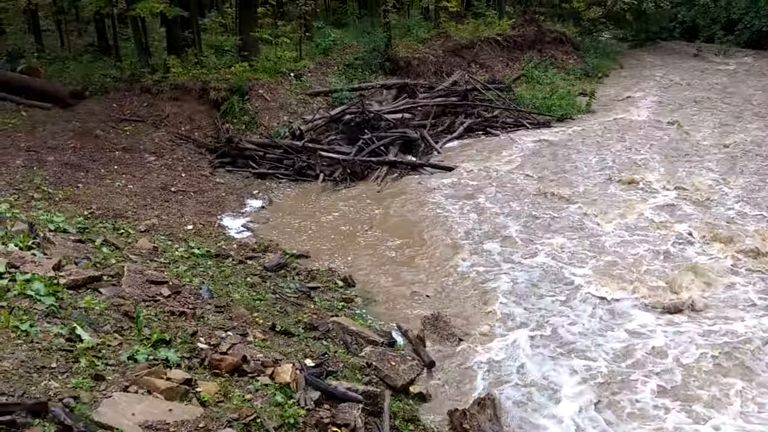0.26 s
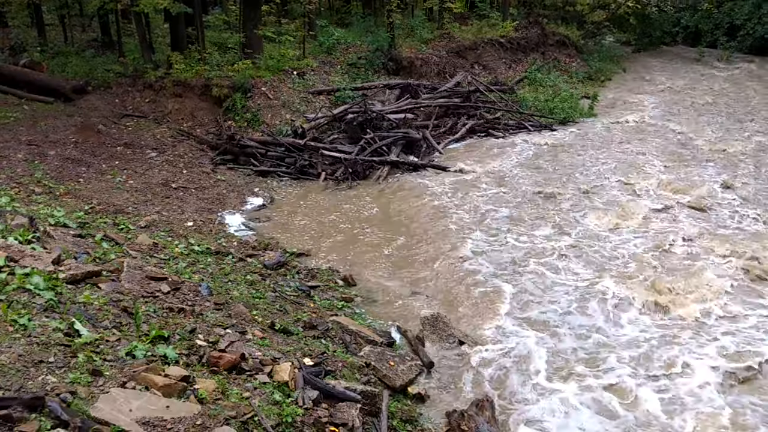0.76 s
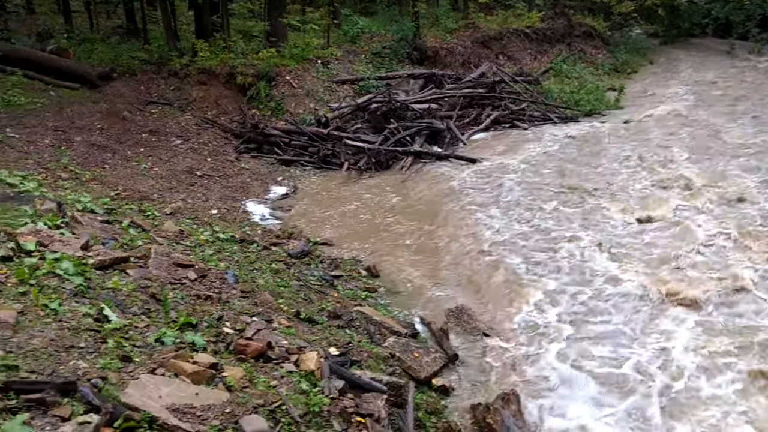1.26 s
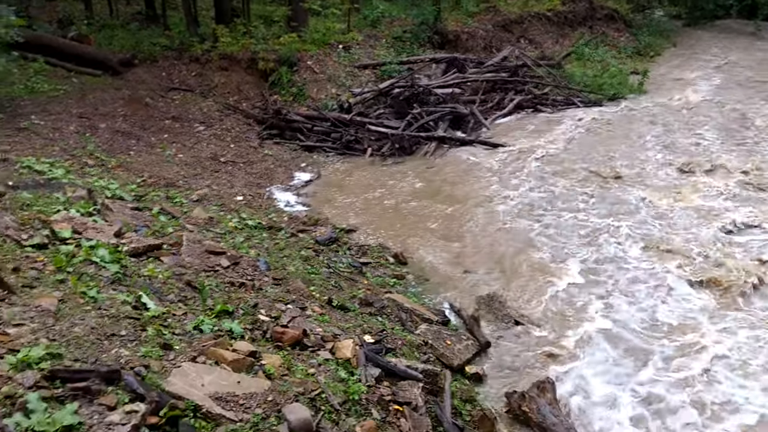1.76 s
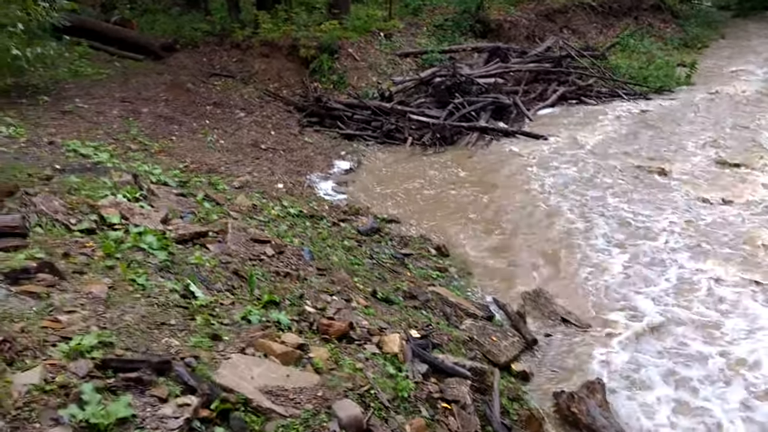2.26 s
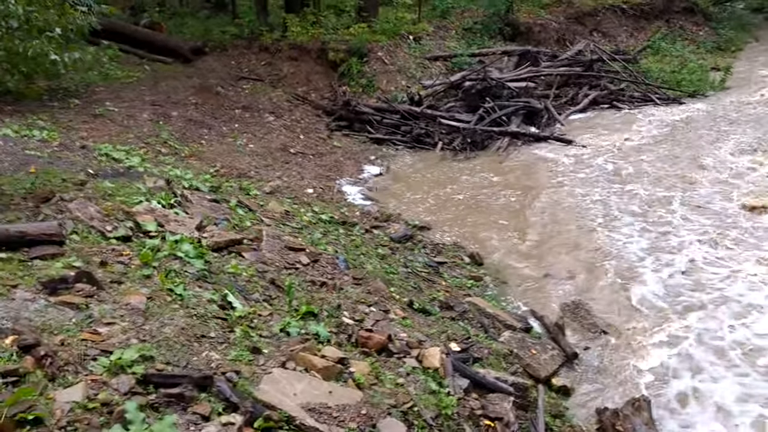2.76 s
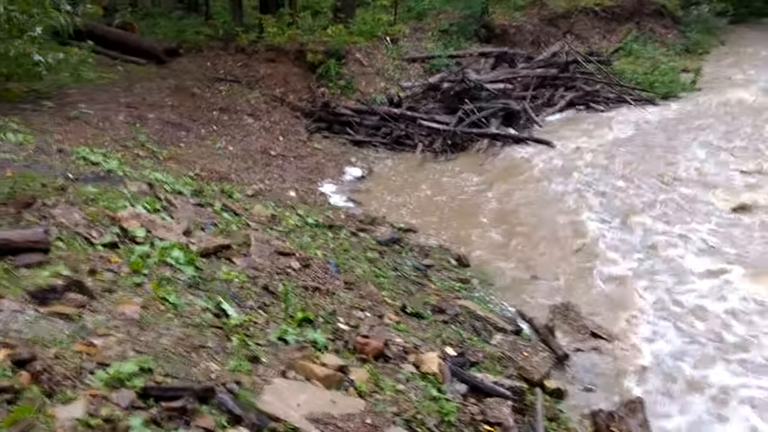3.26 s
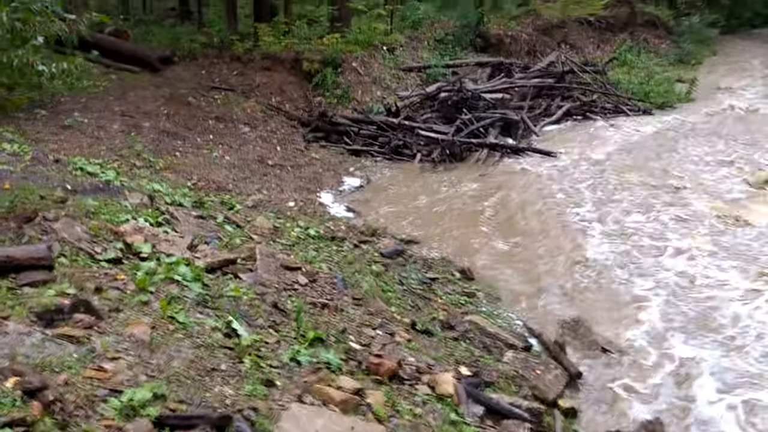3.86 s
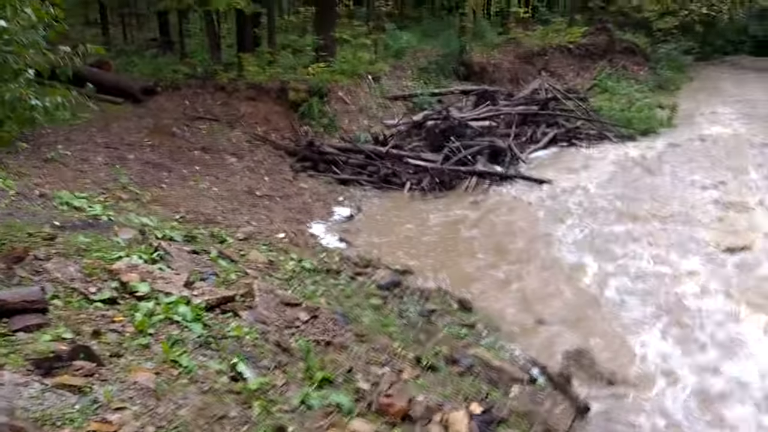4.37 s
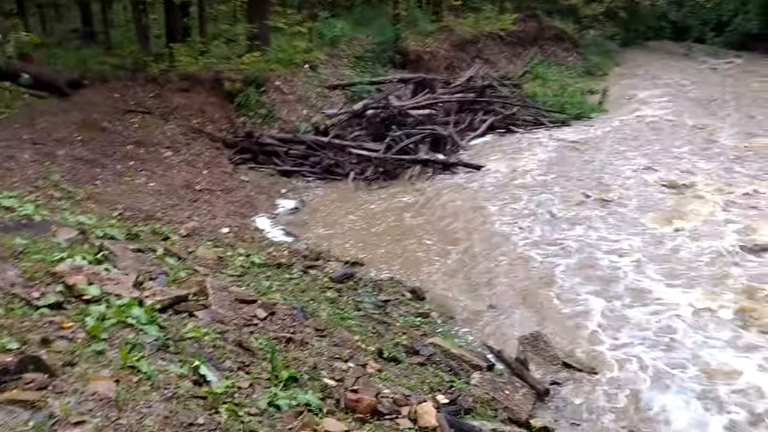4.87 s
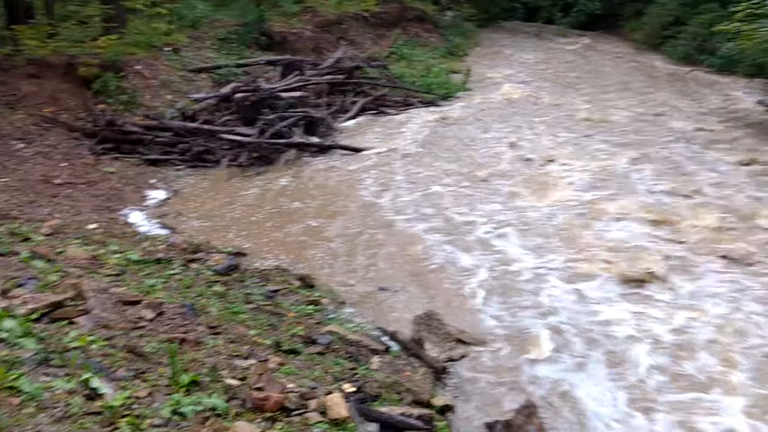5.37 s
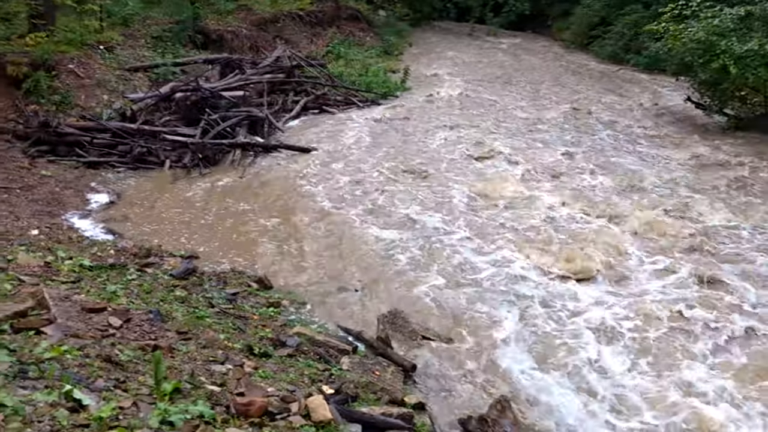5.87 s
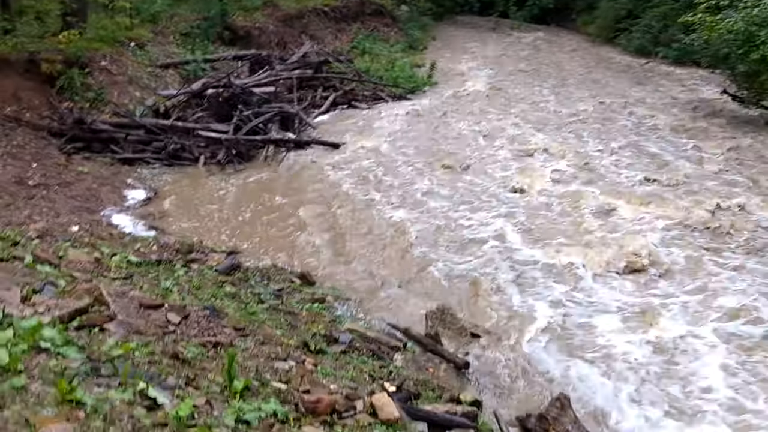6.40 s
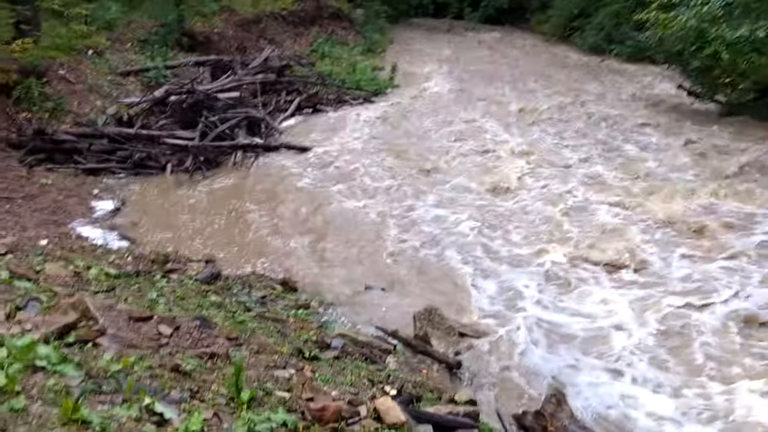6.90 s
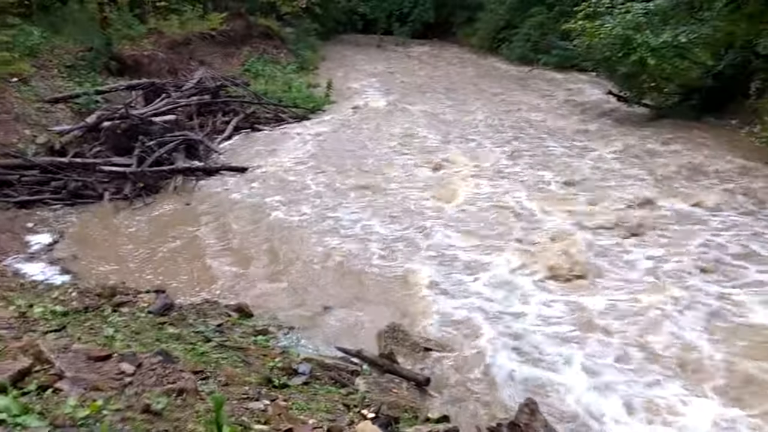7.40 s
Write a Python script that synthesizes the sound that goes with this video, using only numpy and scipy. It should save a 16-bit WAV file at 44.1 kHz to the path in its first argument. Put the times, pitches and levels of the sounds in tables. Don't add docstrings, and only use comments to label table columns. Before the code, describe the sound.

Outdoors beside a flooded creek, fast water roars steadily over rocks, mostly on the right of a handheld stereo microphone. A burst of spray splashes near the left at the start and quickly dies to drips. Small irregular surges then lift the low rumble, midrange churn, gurgling bubbles and hissing spray together. The sound grows slightly softer as the camera turns upstream.

```python
import sys
import numpy as np
from scipy import signal
from scipy.fft import rfft, irfft, next_fast_len
from scipy.io import wavfile
from scipy.ndimage import uniform_filter1d, map_coordinates

SR = 44100
rng = np.random.default_rng(int(sys.argv[2]) if len(sys.argv) > 2 else 0)


def int16_out(signal):
    q = np.round(np.clip(np.atleast_2d(signal).T, -1, 1) * 32767)
    wavfile.write(sys.argv[1], SR, q.astype(np.int16))


def makeup_ratio(level_db):
    decades = np.asarray(level_db, float) / 20
    return 10 ** decades


N = 336924
TIME_S = np.arange(N) / SR

# pitch_hz [Hz], level_db [dB per Hz]
MIST_COLOR = [(6000, -25), (8200, -8), (9600, -2), (10800, -1.5), (12300, 2.5), (13400, 0), (14500, 2.5),
              (15200, 5.5), (16500, -1.5)]
# pitch_hz [Hz], level_db [dB per Hz]
ROAR_COLOR = [(25, -41), (45, -19.5), (70, -9), (100, 0), (150, -2), (250, -3.5), (400, -8.5), (700, -26),
              (1200, -37)]
# pitch_hz [Hz], level_db [dB per Hz]
SPLASH_COLOR = [(800, -30), (2000, 2), (3000, 2), (4500, 0), (7000, -10), (12000, -30)]
# pitch_hz [Hz], level_db [dB per Hz]
SPRAY_COLOR = [(1200, -64), (2200, 3.5), (2800, 2.5), (3800, -3.5), (5200, -2.5), (6500, -5.5),
               (8000, -6.5), (9500, -10.5), (12000, -38)]
# pitch_hz [Hz], level_db [dB per Hz]
CHURN_COLOR = [(120, -34), (250, -5.5), (450, 1), (800, -1), (1300, -1), (1800, -1), (2300, -6.5),
               (3000, -18), (4500, -23.5)]
# crest_s [s], swell_db [dB], half_length_s [s]
BREAKING_WAVES = [(0.03, 2, 0.32), (0.4, 2, 0.17), (0.64, 2.5, 0.1), (0.92, 2.0, 0.16), (1.088, 3, 0.063),
                  (1.418, 1.7, 0.32), (1.694, 2.5, 0.075), (1.86, 2.5, 0.07), (2.1, 1.2, 0.1),
                  (2.46, 2.5, 0.29), (2.745, 2.5, 0.16), (3.37, 2.5, 0.28), (3.757, 2.2, 0.11),
                  (3.93, 2.5, 0.064), (4.22, 2.5, 0.13), (4.6, 1.6, 0.19), (4.885, 2, 0.11),
                  (5.034, 2.5, 0.08), (5.206, 2, 0.13), (5.49, 2, 0.17), (5.72, 3, 0.096),
                  (6.01, 2.5, 0.17), (6.44, 2, 0.13), (6.7, 2, 0.066), (7.003, 1.5, 0.14),
                  (7.237, 2.3, 0.12), (7.526, 1.5, 0.2)]
# start_s [s], turn_db [dB], slack of the port subtraction [0-1]
CAMERA_AIM = [
    (0, -6, .45),
    (.58, -5.5, .45),
    (.68, -6.5, .14),
    (2.4, -7.3, .22),
    (3.4, -7.5, .33),
    (4.85, -8, .2),
    (5, -8, .1),
    (5.8, -8, .14),
    (6.1, -9, .02),
    (7.64, -9, .0),
]
# pitch_hz [Hz], level_db [dB]
BODY_SHADE = [(40, 0.5), (100, -0.9), (220, -2.5), (450, -4), (900, -1), (1700, -9), (3400, -1),
              (5500, -4.5), (9500, -12.5), (11000, -13), (13000, -13), (15500, -14)]
# pitch_hz [Hz], level_db [dB]
UNRELATED = [(60, -32), (130, -23), (230, -15), (350, -11), (520, -7), (900, -4.5), (1300, -2),
             (1800, -1.7), (2600, -0.24), (7000, 0.5), (15000, -.05)]
# pitch_hz [Hz], phase [radians]
LEFT_LEAD = [(45, 0.39), (220, 0.46), (450, .35), (900, 0.74), (1700, 1.52), (4000, 0.75), (8000, 0.00055)]
# pitch_hz [Hz], gain [0-1]
CROSS_GAIN = [(500, 0.76), (1100, 0.76), (2200, 0.93), (3300, 0.82), (4400, 0.73), (5500, 0.67),
              (6600, 0.53), (7700, 0.56), (8900, .54), (9950, 0.8), (11000, 0.45), (13300, 0.33),
              (15400, 0.24)]
# pitch_hz [Hz], phase [radians]
CROSS_TWIST = [(900, 0.027), (2200, 0.055), (4400, 0.15), (6600, -0.042), (8900, -0.36), (9900, -.11),
               (11000, 0.08), (13300, -.3)]
CROSS_S = 20 / 44100


def unit(x):
    return x / np.sqrt(np.mean(x ** 2) + 1e-20)


def along(points, hz):
    point_hz, value = np.transpose(points)
    return np.interp(np.log(hz + 1), np.log(point_hz + 1), value)


def camera_aim():
    start_s, turn_db, slack = np.transpose(CAMERA_AIM)
    return np.interp(TIME_S, start_s, turn_db), np.interp(TIME_S, start_s, slack)


def wobble(rate_hz):
    knots = rng.standard_normal(int(N * rate_hz / SR) + 4)
    return map_coordinates(knots, [np.arange(N) * rate_hz / SR])


def filtered(x, response):
    size = next_fast_len(N + 8192)
    spectrum = rfft(x, size) * response(np.fft.rfftfreq(size, 1 / SR))
    return irfft(spectrum, size)[..., :N]


def rush(color, patchy_db, grain_db):
    drop_size = np.minimum(rng.exponential(size=(2, N)), 3.5)
    drops = rng.standard_normal((2, N)) * makeup_ratio(grain_db * drop_size)
    z = signal.stft(drops, nperseg=512)[2]
    patches = uniform_filter1d(rng.standard_normal(z.shape[1:]), 8, 0)
    patches = uniform_filter1d(patches, 10, 1)
    pair = signal.istft(z * makeup_ratio(patchy_db * unit(patches)), nperseg=512)[1][:, :N]
    return unit(filtered(pair, lambda hz: makeup_ratio(along(color, hz))))


def bubbles(count, centre_hz, octaves, cycles, scatter_db):
    draw = rng.random((count, 4))
    t = np.arange(600) / SR
    hz = centre_hz * 2 ** (octaves * (2 * draw[:, 1:2] - 1))
    size = makeup_ratio(-scatter_db * np.log(draw[:, 2:3] + 1e-4))
    age = t * hz / cycles
    ring = size * age * np.exp(-4 * age) * np.sin(2 * np.pi * hz * t * (1 + 0.12 * age))
    row = N + len(t)
    start = (draw[:, :1] * N).astype(int) + (draw[:, 3:] > 0.5) * row
    out = np.bincount((start + np.arange(len(t))).ravel(), ring.ravel(), 2 * row)
    return unit(out.reshape(2, -1)[:, :N])


def waves():
    crest_s, swell_db, half_s = np.transpose(BREAKING_WAVES)
    t = np.arange(0, N + 64, 64) / SR
    bells = np.exp(-2 * ((t[:, None] - crest_s) / half_s) ** 2)
    return np.interp(TIME_S, t, bells @ swell_db)


def mist(swell_db, surge):
    hidden_db = 1.2 * np.minimum(camera_aim()[0] + 8, 0)
    level_db = -48 - 0.03 * TIME_S + 1.1 * swell_db + hidden_db
    return makeup_ratio(level_db + 4.5 + 1.1 * surge + 0.6 * wobble(45)) * rush(MIST_COLOR, patchy_db=0.8, grain_db=0.0)


def roar(swell_db):
    level_db = -38.5 - 0.15 * TIME_S + 0.9 * swell_db
    return makeup_ratio(level_db + 6.5 + 0.22 * wobble(11.0)) * rush(ROAR_COLOR, patchy_db=0.5, grain_db=0.3)


def splash():
    dying_s = np.maximum(TIME_S - 0.45, 0)
    level_db = np.maximum(-40 - 30 * dying_s, -64)
    return makeup_ratio(level_db + 1.2 * wobble(13.4)) * rush(SPLASH_COLOR, patchy_db=-3.0, grain_db=1.5)[0]


def spray(swell_db, surge):
    level_db = -42 - 0.039 * TIME_S + 0.99 * swell_db
    flicker_db = 1.54 * surge + 0.33 * wobble(60)
    return makeup_ratio(level_db + 2.0 + flicker_db) * rush(SPRAY_COLOR, patchy_db=0.03, grain_db=1.7)


def churn(swell_db, surge):
    level_db = -33.5 - 0.12 * TIME_S + 1.09 * swell_db
    tumble = makeup_ratio(level_db + 2 + 0.49 * surge) * rush(CHURN_COLOR, patchy_db=0.53, grain_db=1.5)
    ringing = bubbles(count=7000, centre_hz=745.0, octaves=1.225, cycles=7.1, scatter_db=2.5)
    gurgle = makeup_ratio(level_db - 7.5 + 0.89 * surge) * ringing
    return tumble + gurgle


def creek():
    swell_db = waves()
    surge = 0.5 * wobble(9) + 0.33 * wobble(25)
    return mist(swell_db, surge) + roar(swell_db) + spray(swell_db, surge) + churn(swell_db, surge)


def ports(field):
    facing, scattered = field

    def shade(hz):
        return makeup_ratio(along(BODY_SHADE, hz))

    def unlike(hz):
        return np.clip(makeup_ratio(along(UNRELATED, hz)), 0, 1)

    def late(hz):
        return np.exp(1j * (along(LEFT_LEAD, hz) - 2 * np.pi * hz * CROSS_S))

    direct = filtered(facing, lambda hz: shade(hz) * np.sqrt(1 - unlike(hz) ** 2) * late(hz))
    diffuse = filtered(scattered, lambda hz: shade(hz) * unlike(hz))
    return np.array([direct + diffuse, facing])


def scene():
    water = creek()
    rapids = filtered(water, lambda hz: np.exp(-(np.log((hz + 1) / 1100) / 0.22) ** 2))
    shadow = np.clip(-0.09 * (camera_aim()[0] + 8.13), -0.2, 0.6)
    left, right = ports(water - shadow * rapids)
    return np.array([left + splash(), right])


def low_pass(x):
    return signal.sosfilt(signal.butter(12, 16660, fs=SR, output="sos"), x)


def record(dry):
    turn_db, slack = camera_aim()

    def cross_path(hz):
        lag = np.exp(-1j * (2 * np.pi * hz * CROSS_S + along(CROSS_TWIST, hz)))
        return np.clip(along(CROSS_GAIN, hz), 0, 1) * lag

    across = filtered(dry[::-1], cross_path)
    loose = filtered(across, lambda hz: 1 / (1 + (2900 / (hz + 1)) ** 4) / (1 + (hz / 5600) ** 6))
    slack = np.clip(slack * makeup_ratio(2.5 * wobble(6)), 0, 0.6)
    tilt = makeup_ratio(0.42 * (turn_db - turn_db.mean()) * np.array([[0.5], [-0.5]]))
    wired = filtered((dry - across + slack * loose) * tilt, lambda hz: hz < 15770)
    finished = wired + 0.00073
    return low_pass(finished)


dry = scene()
out = record(dry)
int16_out(out)
```